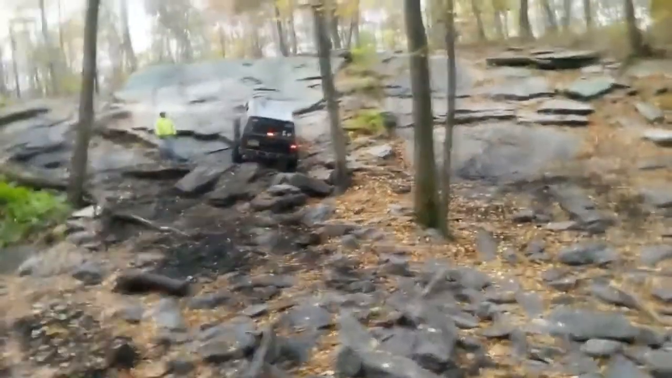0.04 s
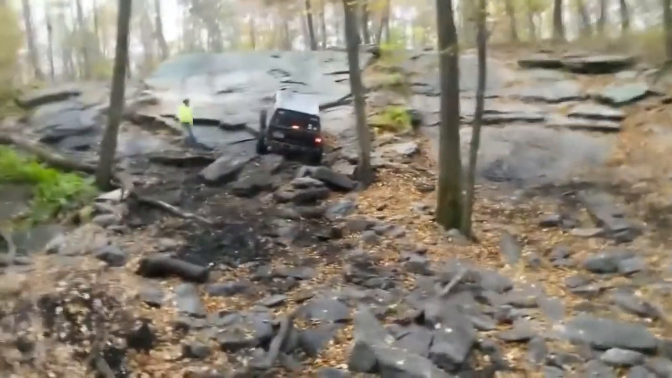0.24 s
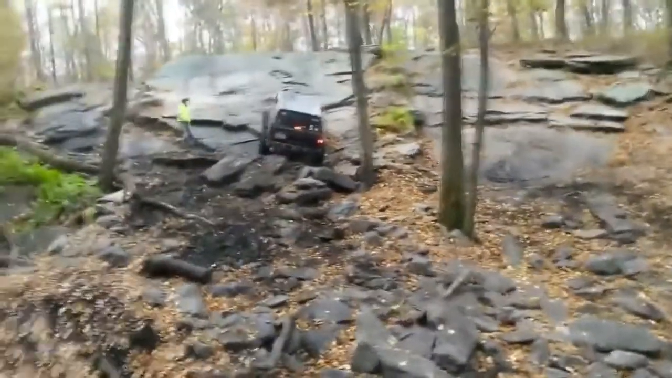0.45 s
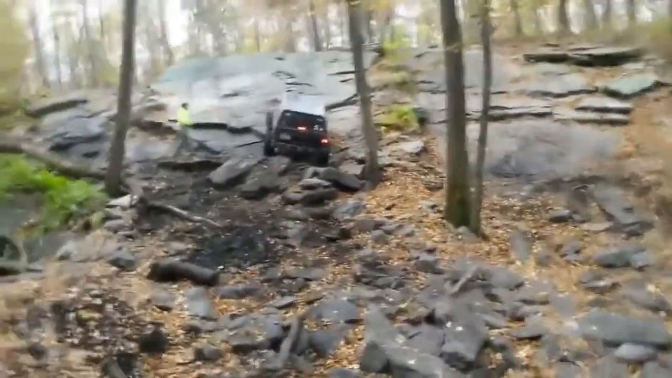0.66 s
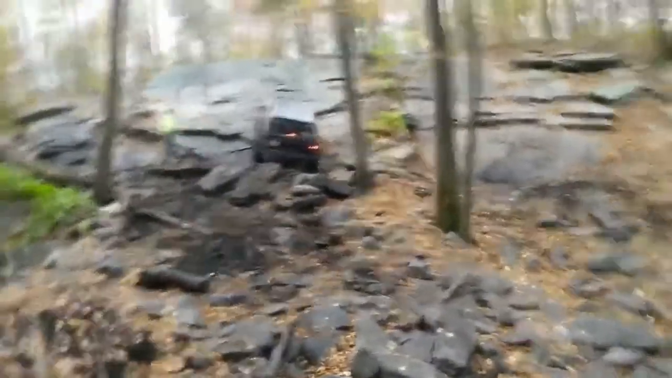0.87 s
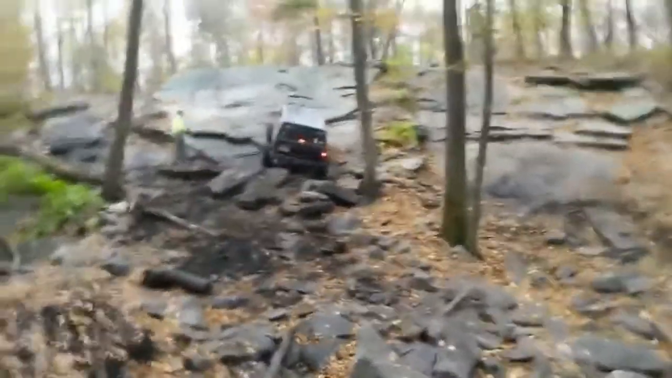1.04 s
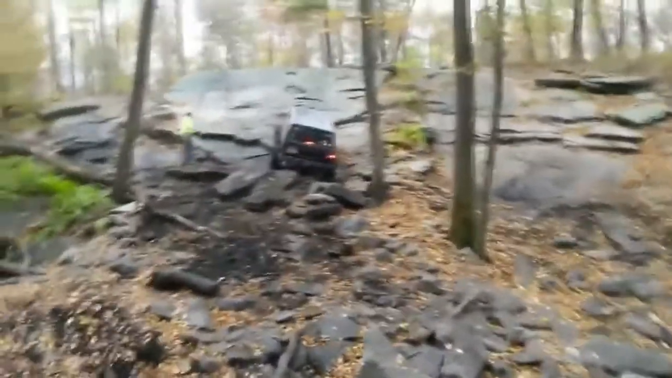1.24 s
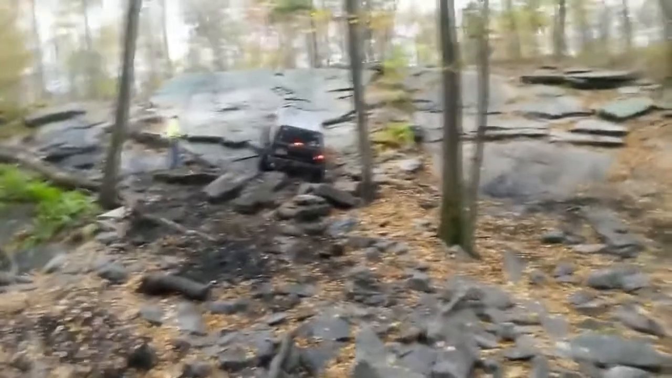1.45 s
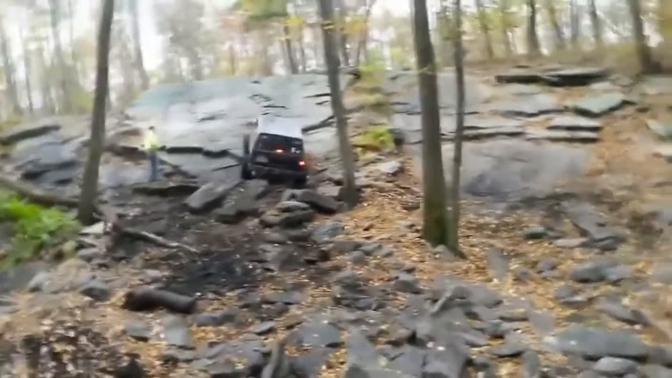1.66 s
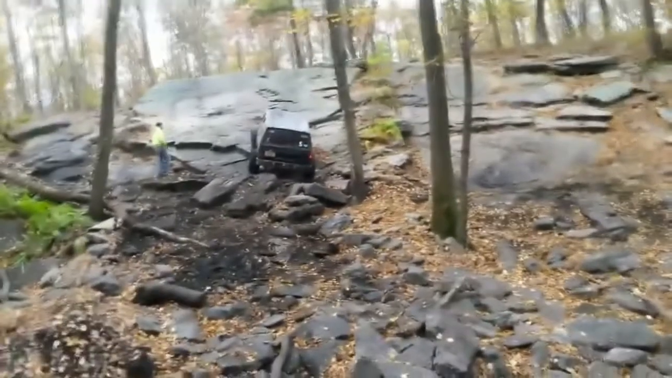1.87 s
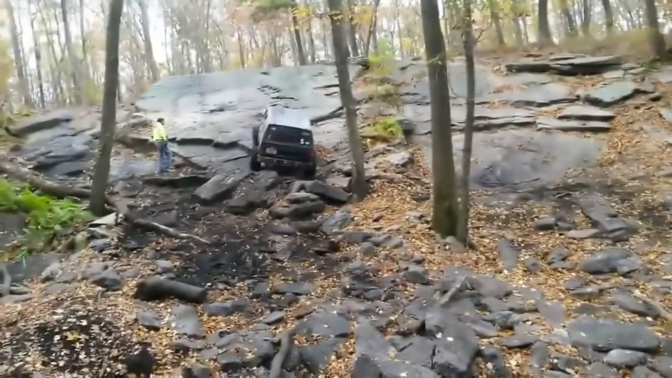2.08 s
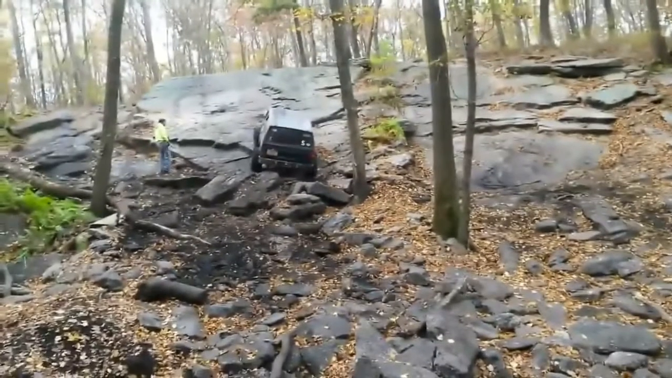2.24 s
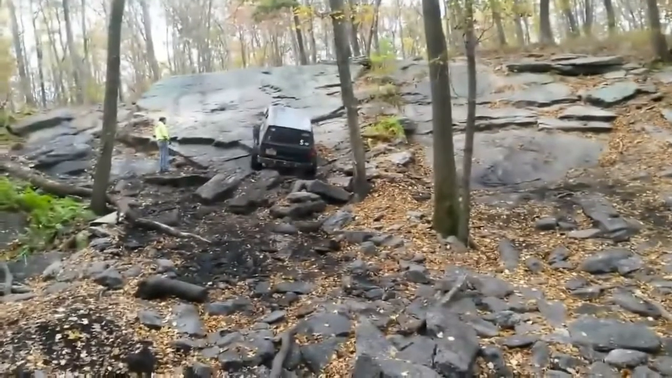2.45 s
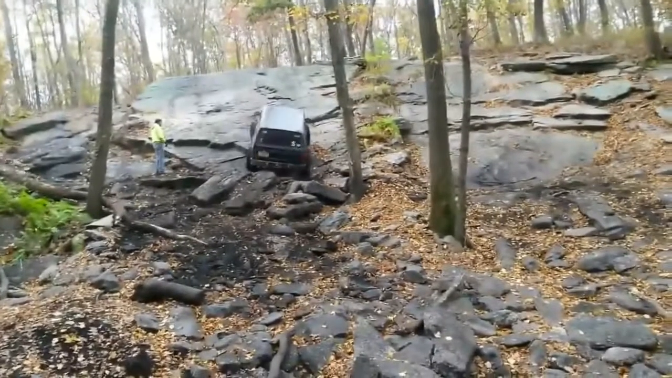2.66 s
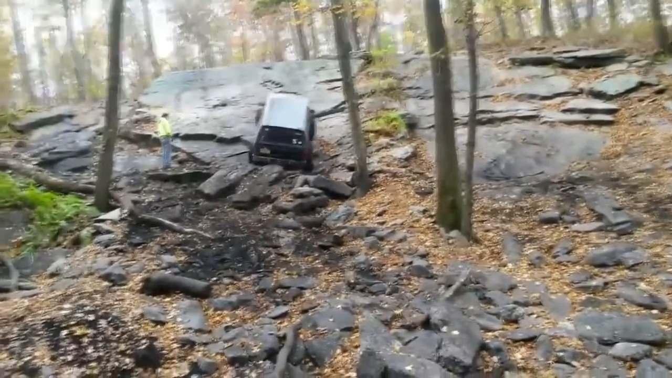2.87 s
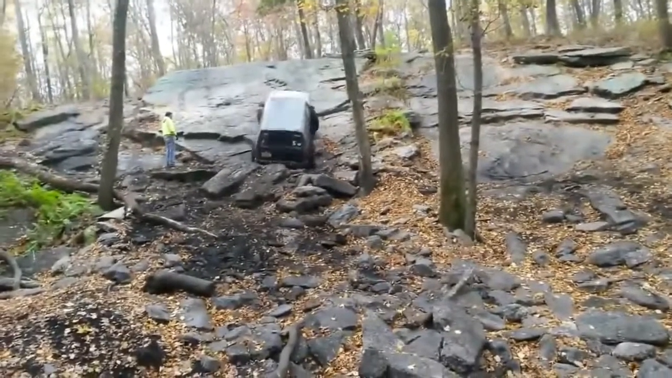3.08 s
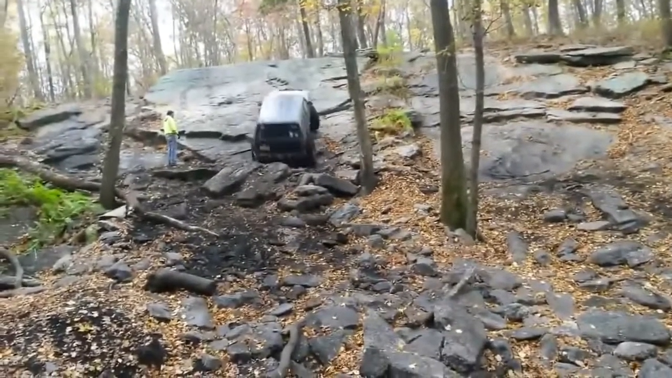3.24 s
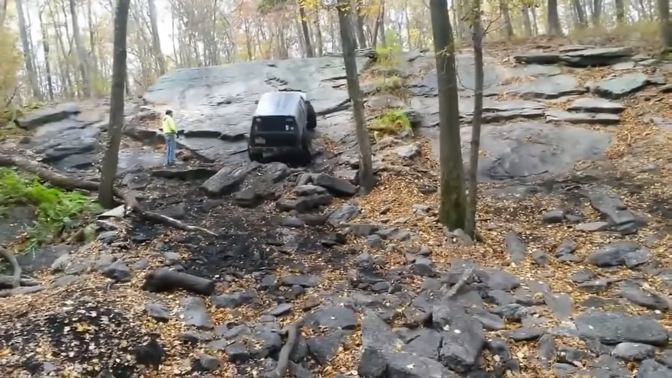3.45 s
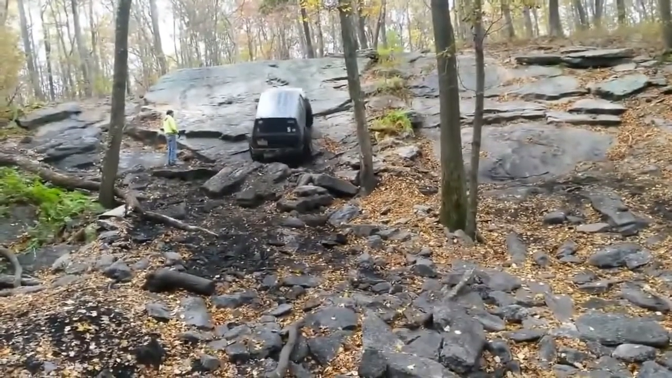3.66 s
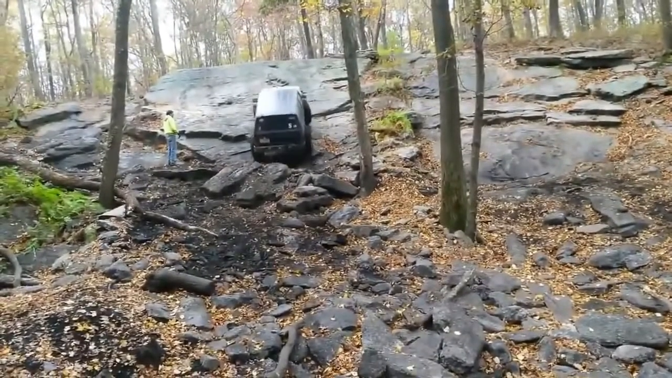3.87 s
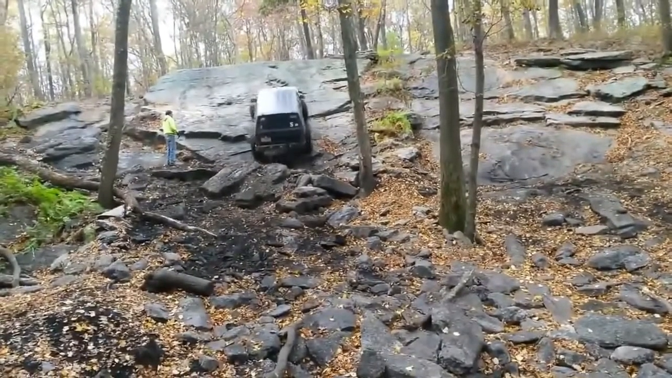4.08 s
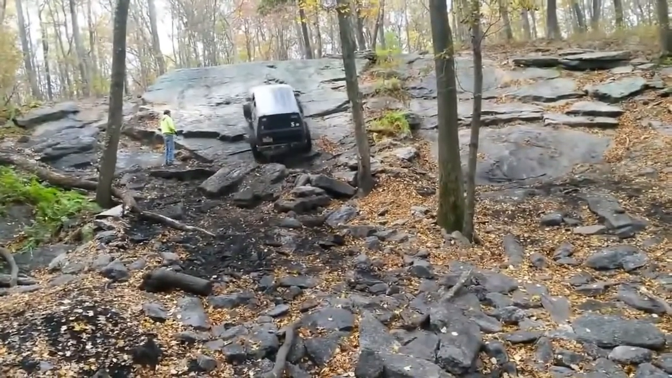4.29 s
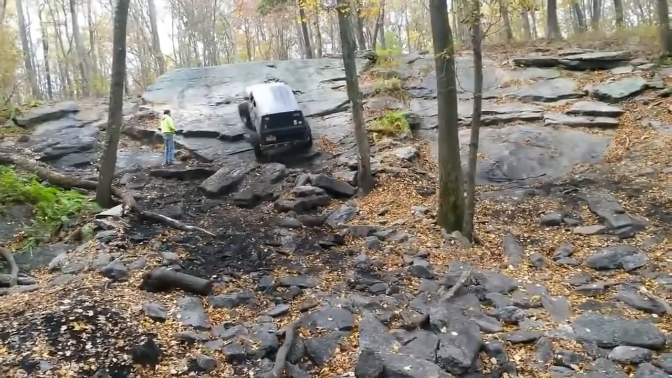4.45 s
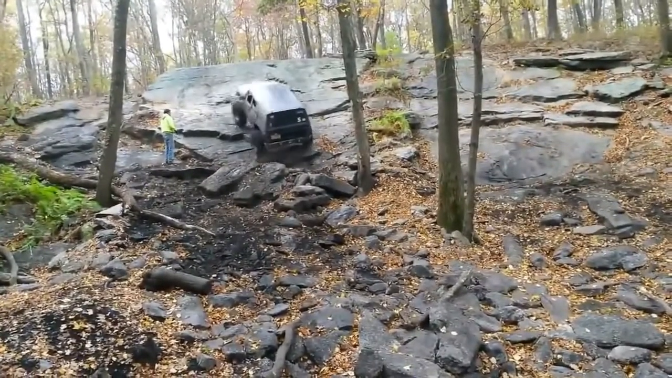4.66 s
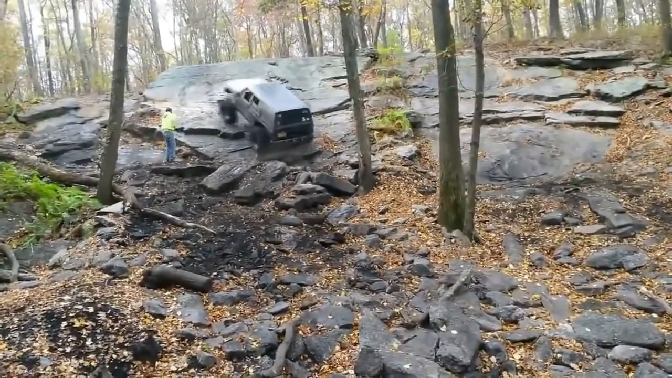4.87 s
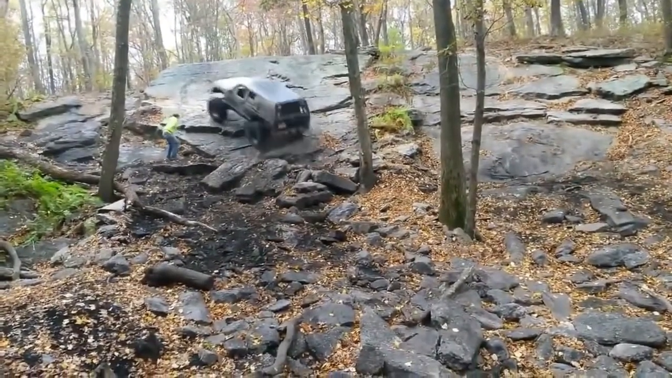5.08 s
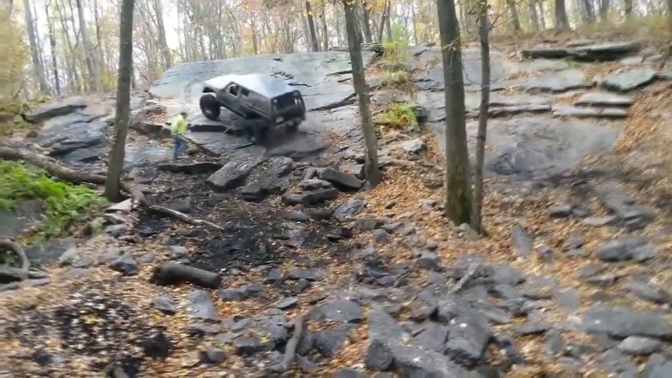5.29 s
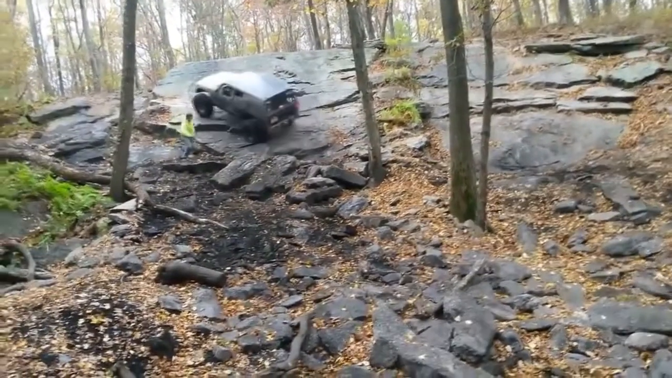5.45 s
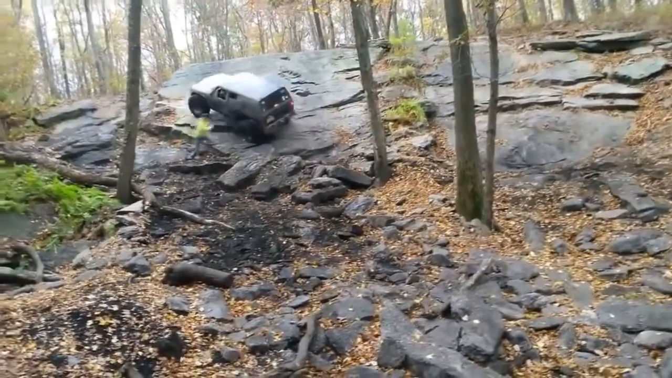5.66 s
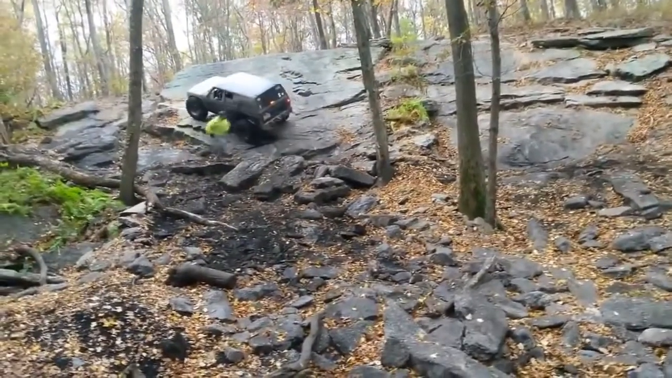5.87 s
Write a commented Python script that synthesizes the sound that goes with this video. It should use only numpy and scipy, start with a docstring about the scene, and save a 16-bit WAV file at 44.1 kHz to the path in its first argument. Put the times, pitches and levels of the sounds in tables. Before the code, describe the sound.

A four-wheel-drive is heard from a short distance in woodland beside a rock slab, in stereo. From 0 to 2.1 s it idles low and lumpy, slightly stronger until about 0.5 s, over faint hiss and soft engine churn. At about 2.15 s the throttle opens with a quick flurry of muffled exhaust cracks; a deep boom surges and airy hiss swells in gulps as the revs climb. A very short, sharp stone snap hits at 2.7 s, with the engine ducking briefly around it. Gritty wet spray crackles near 3.35 s. Revs keep rising into a hard, raspy howl with broad fan and tyre roar, loudest about 4.1 to 4.9 s. Pitch then slides down, roughening, and the roar fades after 5.3 s. Near idle again, metallic clanks land at 5.59, 5.62 and, strongest and brightest, 5.74 s, then faint debris rustle and a tiny high brake squeak at 5.8 s.

```python
"""Six-cylinder up a wet rock slab

A four-wheel-drive idles lumpily in woodland, then revs up a wet rock slab and lets off. The exhaust is
summed from sines on the firing rate, uneven filtered pulses, and a rasp of noise puffs and engine orders.
Shaped noise makes the throttle hiss, the fan and tyre roar, a snapping stone and sprays of wet grit.
At the top the chassis clanks three times, then debris rustles faintly, all from decaying modes and crash
noise, and a brake squeaks as swelling sines.
"""
import sys
import numpy as np
from scipy import signal
from scipy.fft import rfft, irfft, next_fast_len
from scipy.io import wavfile
from scipy.ndimage import uniform_filter1d, map_coordinates

SR = 44100
rng = np.random.default_rng(int(sys.argv[2]) if len(sys.argv) > 2 else 0)


def wrap_up_sound(samples):
    """Save the sound to the file named by the first command line argument, as 16-bit audio."""
    columns = np.atleast_2d(samples).T
    # keep every value between -1 and 1, then stretch to whole-number steps
    tamed = np.clip(columns, -1, 1)
    steps = np.round(tamed * 32767).astype(np.int16)
    wavfile.write(sys.argv[1], SR, steps)


N = 261099
T = np.arange(N) / SR  # s

# boom: firing rates between which its mix of multiples shifts; random level waver per multiple
IDLE_HZ, REVVING_HZ, WAVER_DB = 37.8, 72, .6
# crank throb: level and its growth with speed, relative to the reference firing rate
TOP_HZ, THROB_DB, THROB_DB_PER_OCTAVE = 255, -24, 23.5
# rasp: from soft to hard firing rate it turns from puffs into pitched orders and grows louder
SOFT_HZ, HARD_HZ = 139, 255
SOFT_SHARE, HARD_SHARE = 0.054, 0.58  # pitched share of the power, before slowing reduces it
SOFT_RASP_DB, HARD_RASP_DB = 1, 3.5  # relative to the load level
BREAKUP_HZ_PER_S = 574  # slowing at this rate halves the pitched share
# rush: gain relative to the load level, and how fast it and the rasp fade after the last load point
RUSH_DB, RUSH_FADE_DB_PER_S = 3, 25
# finest tyre fizz within the rush: level at TOP_HZ, growth with speed, random flutter
FIZZ_DB, FIZZ_DB_PER_OCTAVE, FIZZ_FLUTTER_DB = -14.5, 4, 0.1
POP_T60_S = .036
# the stone's snap: time and peak level; rush and rasp dip briefly around it, the boom by a share in dB
SNAP_S, SNAP_DB = 2.7078, -4.5
DIP_DB, DIP_WIDTH_S, BOOM_DIP_SHARE = -16, 0.011, 0.49
GRIT_RISE_S, GRIT_T60_S = 0.021, 0.21
HISS_DB, CHURN_DB = -46, -40  # centre levels of the background
EDGE_HZ = 14600  # band limit of the microphones


def amp(db):
    """Decibels to gain."""
    return 10 ** (np.asarray(db) / 20)


def unit(x):
    """Scales to rms 1."""
    return x / np.sqrt(np.mean(x ** 2) + 1e-20)


def between(x, low, high):
    """0 at low, 1 at high, straight in between."""
    return np.clip((x - low) / (high - low), 0, 1)


def curve(rows):
    """Every column of a time table, sample by sample."""
    s, *columns = np.transpose(rows)
    return [np.interp(T, s, column) for column in columns]


def read(points, hz):
    """A spectrum joined on a log-frequency axis."""
    point_hz, value = np.transpose(points)
    return np.interp(np.log(hz + 1), np.log(point_hz + 1), value)


def filtered(x, gain):
    """Applies a gain given as a function of frequency."""
    size = next_fast_len(N + 8192)
    hz = np.fft.rfftfreq(size, 1 / SR)
    return irfft(rfft(x, size) * gain(hz), size)[..., :N]


def colour(x, spectrum):
    """Filters by a spectrum, falling steeply below its first point."""
    lowest_hz = spectrum[0][0]
    return filtered(x, lambda hz: amp(read(spectrum, hz)) * np.minimum(hz / lowest_hz, 1) ** 4)


def wander(rate_hz):
    """Slow random drift of rms 1: smoothly joined random knots, two per period of the rate."""
    knots = rng.standard_normal(2048)
    drift = map_coordinates(knots, [T[::32] * rate_hz * 2], order=3)
    return unit(drift).repeat(32)[:N]


def pair(x):
    """Two unrelated signals become a microphone pair whose likeness varies with frequency."""
    # left-right likeness, clipped to -1..1 in use: frequency_hz, correlation
    likeness = [(60,2.2),(400,0.84),(700,1.08),(1400,-0.1),(3000,1.13),(6500,-0.77),(14000,0)]
    common = filtered(x[0], lambda hz: np.sqrt(1 + np.clip(read(likeness, hz), -1, 1)))
    apart = filtered(x[1], lambda hz: np.sqrt(1 - np.clip(read(likeness, hz), -1, 1)))
    return np.array([common + apart, common - apart])


def noise(spectrum, grain_db=0):
    """Stereo turbulence of rms 1; grain scales 16-sample specks unequally, for a crackle."""
    specks = np.minimum(rng.exponential(1, N // 16 + 1), 6)
    sizes = amp(grain_db * specks).repeat(16)[:N]
    return unit(colour(pair(rng.standard_normal((2, N)) * sizes), spectrum))


def dying(s, t60):
    """Envelope of a blow at time s: sudden onset, then exponential decay."""
    return (T >= s) * amp(-60 * np.maximum(T - s, 0) / t60)


def woods(x, t60, wet_db):
    """Rock face and trunks scatter a short tail of sparse echoes, different at each ear."""
    t = np.arange(SR // 2) / SR
    taps = rng.standard_normal((2, len(t)))
    taps *= (rng.random((2, len(t))) < .05) * (t > .006) * amp(-60 * t / t60)
    taps /= np.linalg.norm(taps, axis=1, keepdims=True)
    tail = signal.fftconvolve(np.atleast_2d(x), taps, axes=1)[:, :N]
    return x + amp(wet_db) * pair(tail) / np.sqrt(2)


def boom(firings, firing_hz, push_db):
    """Clean exhaust note: multiples of the firing rate sweep the pipe's resonances, over the crank's throb."""
    # how strongly the exhaust carries a clean note: frequency_hz, gain_db
    carry = [(35,-21.5),(48,-23),(64,-12),(85,-15),(112,-8.5),(125,-9),(145,-14),(172,-15.5),(207,-11.5),(229,-20.5),(249,-19),(260,-25),(345,-24.5),(390,-19.5),(430,-35),(490,-18.5),(540,-37)]
    # first to third multiple of the firing rate; pulses round off with speed: idle_db, revving_db
    multiples = [(-7,0.5),(-4.5,-5.5),(-1.5,-17.5)]
    revving = between(firing_hz, IDLE_HZ, REVVING_HZ)
    lines = np.zeros(N)
    for k, (idle_db, revving_db) in enumerate(multiples, 1):
        balance_db = idle_db + (revving_db - idle_db) * revving
        db = read(carry, k * firing_hz) + balance_db + WAVER_DB * k * wander(9)
        lines += amp(db + push_db) * np.sin(2 * np.pi * k * firings)
    turns = firings / 3  # three firings per crank turn
    throb_db = THROB_DB + THROB_DB_PER_OCTAVE * np.log2(firing_hz / TOP_HZ)
    throb = amp(throb_db) * np.sin(2 * np.pi * turns)
    return np.sqrt(2) * (lines + throb)


def burble(firings):
    """Cylinders fire unequally; the surplus of each, and its puff of turbulence, ring the pipe."""
    # exhaust pipe spectrum: frequency_hz, level_db
    pipe = [(45,-22),(66,-14),(88,-6),(112,-9),(138,3.5),(165,-10.5),(212,-8),(255,-18),(330,-13.5),(420,-21),(500,-18),(600,-26.5),(780,-27.5),(1300,-56.5)]
    # level of the uneven firing: time_s, level_db
    unevenness = [(0,-24.5),(.6,-25.5),(2.6,-25.5),(3,-29.5),(4.2,-24.5),(4.8,-27),(5.3,-19.5),(5.75,-29.5)]
    cylinders = np.array([0.85, -0.98, 1.0, 0.43, -1.02, -0.5])
    at = np.flatnonzero(np.diff(np.floor(firings)))
    chance = .2 * rng.standard_normal(2048)[:len(at)]
    pulses = np.zeros(N)
    pulses[at] = cylinders[np.arange(len(at)) % len(cylinders)] + chance
    pulses /= np.sqrt(np.gradient(firings))  # same power at any speed
    pulses = filtered(pulses, lambda hz: 1 / (1 + (hz / 600) ** 4))  # the silencer rounds each edge
    puffs = pair(rng.standard_normal((2, N))) * (1 + np.exp(-(firings % 1) / 0.44))
    echoed = woods(pulses, t60=.16, wet_db=4)
    gas = unit(colour(echoed, pipe)) + amp(-1) * unit(colour(puffs, pipe))
    gas /= np.sqrt(uniform_filter1d((gas ** 2).mean(0), size=6000))  # evens the power over 0.14 s
    return amp(curve(unevenness)[0]) * gas


def pops():
    """The first hard firings crack in the pipe as the throttle snaps open: short noise bursts."""
    # exhaust cracks: time_s, level_db
    cracks = [(2.155,-26),(2.179,-22.5),(2.203,-26),(2.222,-21.5),(2.242,-24.5)]
    # spectrum of a crack: frequency_hz, level_db
    crack_spectrum = [(300,-10),(850,5),(1400,-3),(2300,1.5),(3300,-10),(7000,-21),(12000,-36)]
    return noise(crack_spectrum) * sum(amp(db) * dying(s, POP_T60_S) for s, db in cracks)


def ringing(hz):
    """Gain of the tailpipe's resonances."""
    # resonances that the passing orders light up: centre_hz, width_hz, peak_db
    rings = [(503,140,-2),(663,21,4),(803,21,6.5),(950,19.8,6.5)]
    return amp(sum(db / (1 + (2 * (hz - centre) / width) ** 2) for centre, width, db in rings))


def rasp(firings, firing_hz):
    """Gas tearing from the tailpipe: puffs of noise, hardening into engine orders as speed climbs."""
    # engine orders: multiple of the engine cycle of six firings, level_db
    strong = [(3, -7.5), (4, -6), (5, -4), (7, -12), (8, -9), (9, -4), (10, -6.5), (11, -16), (14, -16),
              (16, -1), (19, -15.5), (20, -7.5), (21, -9), (22, -1.5), (23, -25), (24, -24.5), (25, -14),
              (26, -24), (28, -11.5), (30, -55), (32, -31)]
    # tailpipe blast spectrum: frequency_hz, level_db
    blast = [(150,-1),(300,4),(480,5),(570,1),(680,-0.5),(850,3.5),(1080,-34),(1350,-24),(2200,-38)]
    cycles = firings / 6 + 0.0011 * wander(25)  # the crank shudders, fraying the high orders most

    def order(k, db):
        """One multiple of the engine cycle; the low ones are the steadiest in level."""
        flutter_db = min(1 + k / 8, 2.3) * wander(12)
        phase = 2 * np.pi * (round(k) * cycles + rng.random()) + 0.46 * wander(22)
        return amp(db + flutter_db) * np.cos(phase)

    weak = [(k, -12) for k in range(13, 30) if k not in np.round(strong)[:, 0]]
    orders = filtered(sum(order(k, db) for k, db in list(strong) + weak), ringing)
    puffs = unit(noise(blast) * (1 + .5 * np.cos(2 * np.pi * firings)))
    hard = between(firing_hz, SOFT_HZ, HARD_HZ)
    slowing = uniform_filter1d(np.maximum(-np.gradient(firing_hz, T), 0), size=8000)
    pitched = np.clip(SOFT_SHARE + (HARD_SHARE - SOFT_SHARE) * hard, 0, .99)
    pitched = pitched / (1 + slowing / BREAKUP_HZ_PER_S)
    level_db = SOFT_RASP_DB + (HARD_RASP_DB - SOFT_RASP_DB) * hard ** 3
    return amp(level_db) * (amp(2) * np.sqrt(pitched) * unit(orders) + np.sqrt(1 - pitched) * puffs)


def slab(x):
    """A few close reflections off the rock ripple the spectrum."""
    delays_s = rng.uniform(.003, .024, (2, 9, 1))
    return unit(filtered(x, lambda hz: 1 + .17 * np.exp(-2j * np.pi * hz * delays_s).sum(1)))


def rush(firings, firing_hz):
    """The throttle hisses in gulps at low speed; fan and spinning tyres take over as the speed climbs."""
    # throttle hiss spectrum: frequency_hz, level_db
    throttle_spectrum = [(590, -21), (1000, 3.5), (1350, -1.5), (1550, 2.5), (1910, 4.5), (2090, 3),
                         (2530, 5.5), (3100, -2), (5300, 5), (7010, -1.5), (8100, -10), (12000, -13),
                         (14500, -34)]
    # fan and tyre roar spectrum: frequency_hz, level_db
    roar_spectrum = [(590, -31), (1000, 0.5), (1120, -6.5), (1210, -6), (1320, -8), (1940, -5.5),
                     (3060, -7), (4140, -10.5), (5600, -4.5), (7250, -14.5), (8010, -18.5), (9690, -26),
                     (12300, -23.5), (13300, -27), (14500, -48)]
    spin = np.clip((firing_hz - 95) / 110, 0, 1)
    gulp_db = 2 * np.minimum(50 / firing_hz, 1) * np.cos(2 * np.pi * firings)
    throttle = slab(noise(throttle_spectrum, grain_db=0.0)) * unit(amp(gulp_db))
    turn_db = 0.28 * np.cos(2 * np.pi * firings / 3)
    roar = slab(noise(roar_spectrum, grain_db=1.0)) * amp(turn_db)
    return (np.sqrt(1 - spin) * throttle + np.sqrt(spin) * roar) * amp(0.74 * wander(30))


def fizzed(air, firing_hz):
    """Sets the tyres' finest fizz, the rush's top band, to its own level that grows with speed."""
    spray = filtered(air, lambda hz: np.clip((hz - 7800) / 1500, 0, 1))
    fizz_db = FIZZ_DB + FIZZ_DB_PER_OCTAVE * np.log2(firing_hz / TOP_HZ) + FIZZ_FLUTTER_DB * wander(6.2)
    return air - spray + amp(fizz_db) * unit(spray)


def stones():
    """One stone snaps under a tyre as a very short noise burst; later two crackling sprays of wet grit."""
    # spectrum of the snap: frequency_hz, level_db
    snap_spectrum = [(500,-18),(1400,-6),(3500,-4),(4500,-5),(5700,1),(7200,-13),(10000,-19),(14500,-23)]
    # sprays flung by the tyres: peak_time_s, level_db
    grit = [(3.335,-30),(3.385,-28.5)]
    crack = noise(snap_spectrum)[0] * dying(SNAP_S, t60=.006)
    snap = amp(SNAP_DB) * crack / abs(crack).max()
    spatter = noise([(3000, -12), (5700, 0), (8000, -5), (14000, -6)], grain_db=2.2)
    sprays = np.zeros(N)
    for s, db in grit:
        rise = between(T, s - GRIT_RISE_S, s)
        sprays += amp(db) * rise * amp(-60 * np.maximum(T - s, 0) / GRIT_T60_S)
    return snap + spatter * sprays


def chassis():
    """The chassis clanks three times, then debris rustles: modes over crash noise; a brake squeaks."""
    # three clanks, then a faint longer rustle of debris:
    # time_s, level_db, crash_t60_s, brightness_db_per_octave
    blows = [(5.588,-35,.2,-3),(5.622,-33,.14,-1),(5.743,-26.5,.17,1),(5.8,-40,.6,-3)]
    # chassis modes: frequency_hz, level_db, t60_s
    modes = [(1210,-3,.14),(2010,-7,.12),(2330,-3,.12),(3020,-2,.1),(3170,-2,.11),(3670,-9,.2),(5100,-6,.06),(8450,-10,.05)]
    # crash spectrum: frequency_hz, level_db
    crash_spectrum = [(500,4),(1200,12),(3100,6),(4200,5),(6000,5),(8000,-6),(14000,-14)]
    # brake squeak tones: start_s, length_s, pitch_hz, level_db
    squeaks = [(5.815,0.104,4535,-36),(5.836,0.079,3680,-44)]
    crash, clatter = noise(crash_spectrum, grain_db=-1.0), np.zeros((2, N))
    for s, db, t60, bright_db in blows:
        ring = np.zeros(N)
        for hz, mode_db, ring_s in modes:
            rattle = np.sin(2 * np.pi * hz * T + 1.26 * wander(60))
            ring += amp(mode_db) * dying(s, ring_s) * rattle
        blow = amp(db) * (amp(-2.5) * crash * dying(s, t60) + amp(-3) * ring)
        # tilt about 3 kHz, level below 800 Hz
        clatter += filtered(blow, lambda hz: amp(bright_db * np.log2(np.maximum(hz, 800) / 3000)))
    squeak = np.zeros(N)
    for s, length, hz, db in squeaks:
        u = np.clip((T - s) / length, 0, 1)
        swell = np.sin(np.pi * u ** (2 / 3)) ** 2  # the pad grabs quickly and lets go slowly
        squeak += amp(db) * swell * unit(np.sin(2 * np.pi * hz * T + 0.43 * wander(57)))
    return woods(clatter, t60=.25, wet_db=-7) + woods(squeak, t60=.1, wet_db=-10)


def background(firings):
    """Valve train and belts churn with each firing, under a faint hiss that swells with each crank turn."""
    # still air spectrum: frequency_hz, level_db
    still_air = [(530, -51), (900, -6), (1160, 3.5), (1320, 1), (1400, 4), (1980, -2), (2280, 1),
                 (2690, -4), (3230, -1.5), (3850, -7.5), (6280, -2), (9000, -12), (9320, -13), (11600, -2),
                 (14500, -18)]
    # valve train and belt spectrum: frequency_hz, level_db
    bay = [(200,3),(330,5.5),(420,-12.5),(500,-7),(620,-19.5),(800,-7),(1300,-24.5)]
    hiss_db = HISS_DB + 0.85 * np.cos(2 * np.pi * firings / 3) + 0.81 * wander(3.7)
    hiss = amp(hiss_db) * slab(noise(still_air))
    churn = amp(CHURN_DB + 2 * np.cos(2 * np.pi * firings)) * noise(bay)
    return hiss + churn


def scene():
    """Engine speed drives the engine layers; pulse strength sets the boom, load opens the rasp and rush."""
    # engine speed: time_s, firing_rate_hz
    speed = [(0,38.33),(.33,39.52),(.53,34.15),(1.95,35.56),(2.11,38.82),(2.3,61.2),(2.5,97.2),(2.73,119.7),(2.98,143.3),(3.15,173.8),(3.36,168.9),(3.56,194),(3.92,217.2),(4.05,239),(4.31,252.2),(4.63,259.4),(4.94,218.5),(5.29,162.4),(5.49,107),(5.63,68.5),(5.8,42.87),(5.92,38.5)]
    # strength of the exhaust pulses (a touch of throttle, idle, the climb, lifting off): time_s, level_db
    push = [(0,-11),(.35,-11.5),(.55,-19),(2.1,-17.5),(2.17,1.5),(2.62,-0.5),(3.05,-1),(3.8,-1.5),(4.6,1),(5,3),(5.29,1),(5.38,-12),(5.75,-16.5),(5.92,-15)]
    # load on engine and tyres, as the base level of rush and rasp: time_s, level_db
    load_points = [(2.11,-51),(2.18,-38.5),(2.37,-29.5),(2.66,-29.5),(2.76,-33),(3.02,-33.5),(3.66,-28),(4.1,-22),(4.88,-22),(5.07,-26),(5.25,-24),(5.36,-31),(5.5,-40)]
    firing_hz, push_db, load_db = curve(speed)[0], curve(push)[0], curve(load_points)[0]
    firings = np.cumsum(firing_hz) / SR  # running count
    dip_db = DIP_DB * np.exp(-((T - SNAP_S) / DIP_WIDTH_S) ** 2)
    fade_db = RUSH_FADE_DB_PER_S * np.maximum(T - load_points[-1][0], 0)
    load = (T > load_points[0][0]) * amp(load_db + dip_db - fade_db)
    air = fizzed(rush(firings, firing_hz), firing_hz)
    driven = load * (amp(RUSH_DB) * air + rasp(firings, firing_hz))
    exhaust = boom(firings, firing_hz, push_db + BOOM_DIP_SHARE * dip_db) + burble(firings) + pops()
    return exhaust + driven + background(firings) + stones() + chassis()


def record(dry):
    """Each microphone port has its own colour and the right one hears the car first; then the band limit."""
    # level difference of the ports: frequency_hz, left_minus_right_db
    sides = [(60,-1.8),(200,-3.5),(400,-3.5),(700,-0.5),(1300,1.5),(2400,0.5),(3500,1),(4500,6.5),(5700,10.5),(7300,-2),(8800,-11),(14000,-13.5)]

    def port(sign):
        """Gain and delay of one port (left +1, right -1), the pair's power kept."""
        def response(hz):
            """Complex gain; the ports are 60 microseconds apart."""
            gain = np.sqrt(2 / (1 + amp(-sign * read(sides, hz)) ** 2))
            return gain * np.exp(-1j * np.pi * hz * sign * 6e-5)
        return response

    dry = dry * signal.windows.tukey(N, .001)  # brief fades at both ends
    heard = np.array([filtered(dry[0], port(1)), filtered(dry[1], port(-1))])
    low_pass = signal.firwin(511, EDGE_HZ, window=("kaiser", 9), fs=SR)
    return signal.oaconvolve(heard, low_pass[None], "same")


dry = scene()
out = record(dry)
wrap_up_sound(out)
```